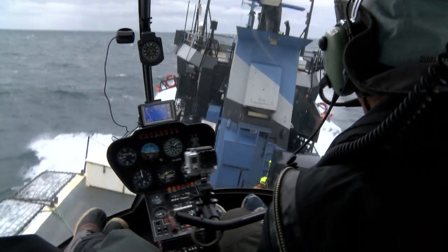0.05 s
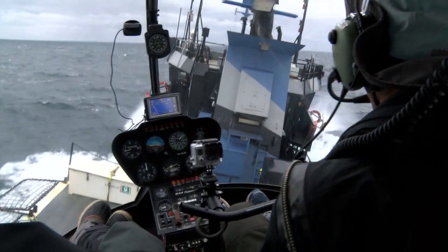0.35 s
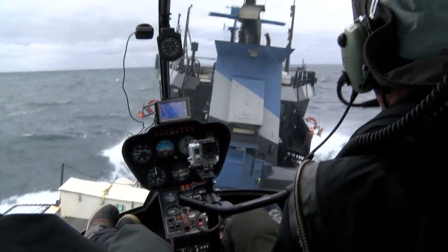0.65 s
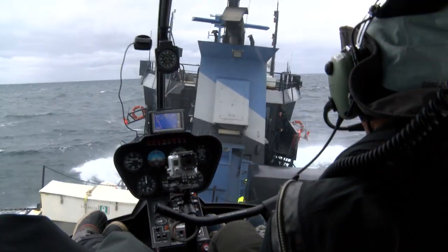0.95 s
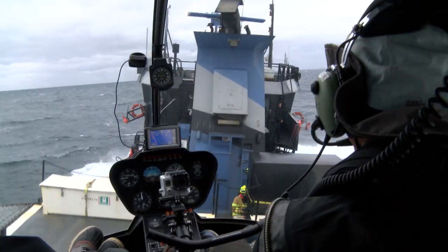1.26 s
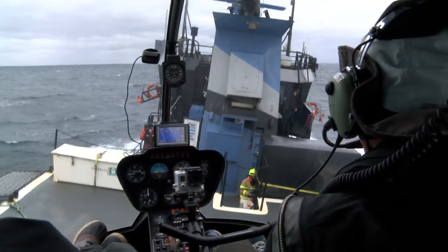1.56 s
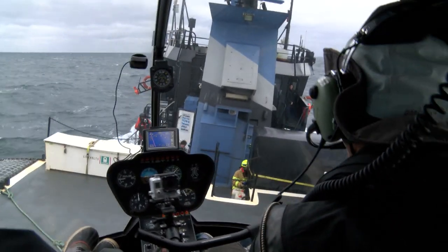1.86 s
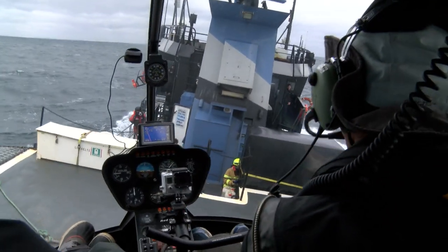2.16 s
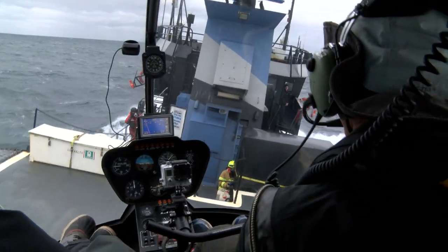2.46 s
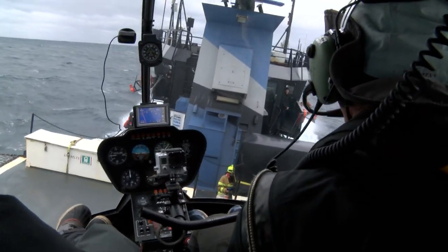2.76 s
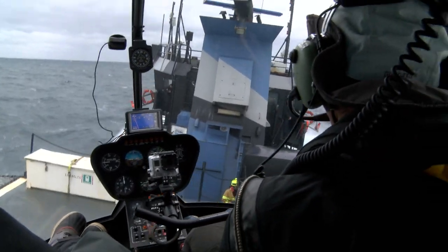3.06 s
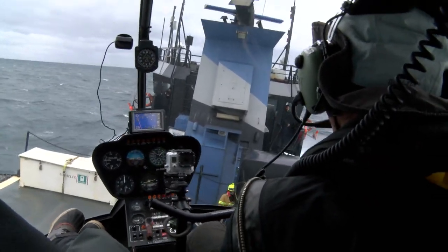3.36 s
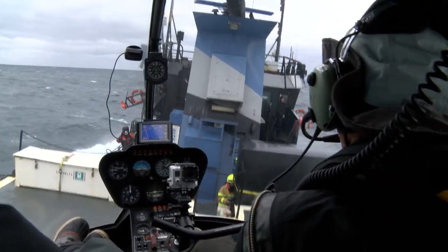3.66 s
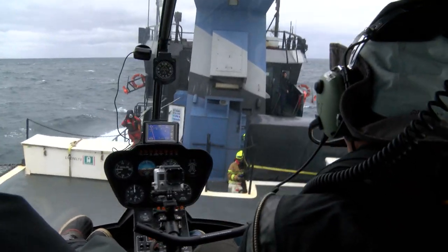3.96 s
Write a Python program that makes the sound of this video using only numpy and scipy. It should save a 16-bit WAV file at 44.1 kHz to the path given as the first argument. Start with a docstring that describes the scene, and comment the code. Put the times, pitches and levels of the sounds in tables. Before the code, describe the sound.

A small hovering helicopter is heard from inside its cabin, the rotor thumping rapidly over an engine drone and a low roar of air for all four seconds. The boom swells from about 1 to 2 seconds, eases, then rises again near 3.7 seconds. A loose fitting rattles faintly throughout, and the blades give irregular hollow knocks. Everything sits on the right side.

```python
"""A two-blade rotor thumps and chops a roar of air, heard from a microphone in the cabin of a small
piston helicopter hovering over a ship's deck at sea. Engine, tail rotor and gears drone in step with it.
A loose fitting rattles in the cabin, and now and then a blade strikes rough air with a hollow knock.
Only the right channel carries the scene; the left holds a faint hiss."""
import sys
import numpy as np
from scipy import signal
from scipy.fft import rfft, irfft
from scipy.io import wavfile
from scipy.ndimage import uniform_filter1d, minimum_filter1d

SR = 44100
rng = np.random.default_rng(int(sys.argv[2]) if len(sys.argv) > 2 else 0)


def pcm_store(signal):
    """Save signal as 16-bit PCM."""
    levels = np.round(np.clip(np.atleast_2d(signal), -1, 1) * 32767)
    wavfile.write(sys.argv[1], SR, levels.astype(np.int16).T)


N = 176400


def amp(db):
    """Decibels to gain."""
    return 10 ** (np.asarray(db) / 20)


def unit(x):
    """Scales to rms 1."""
    return x / np.sqrt(np.mean(x ** 2) + 1e-20)


def curve(points):
    """Joins (time [s], value) points by straight lines."""
    return np.interp(np.arange(N) / SR, *np.transpose(points))


def swing(points):
    """A level curve in dB about its mean."""
    return curve(points) - curve(points).mean()


def colour(x, spectrum):
    """Filters causally by (frequency [Hz], relative level [dB]) points, keeping white noise's power."""
    hz, db = np.transpose(spectrum)
    f = abs(np.fft.fftfreq(8192, 1 / SR))
    log_gain = np.log(amp(np.interp(np.log(f + 1), np.log(hz), db)))
    taps = np.fft.ifft(np.exp(np.conj(signal.hilbert(log_gain)))).real  # minimum phase
    return irfft(rfft(x) * rfft(taps / np.linalg.norm(taps), N), N)


def wander(hz):
    """Random drift of rms 1, up to about hz."""
    f = np.fft.rfftfreq(N, 1 / SR)
    return unit(irfft(rfft(rng.standard_normal(N)) * np.exp(-(f / hz) ** 2) * (f > 0), N))


def add(mix, start, sound):
    """Adds a sound to the mix at start seconds."""
    part = mix[max(round(start * SR), 0):][:len(sound)]
    part += sound[:len(part)]


def drone(cycles, harmonics, waver, waver_hz):
    """Harmonics of a turning part, each wavering in strength and phase."""
    out = np.zeros(N)
    for multiple, db in harmonics:
        angle = 2 * np.pi * (multiple * cycles + rng.random()) + np.pi * waver * wander(waver_hz / 10)
        flutter = waver * wander(waver_hz) * np.cos(angle + np.pi / 4)
        out += amp(db) * np.sqrt(2) * (np.cos(angle) + flutter)
    return out


# Blades passing over the cabin: (time [s], rate [Hz])
BLADE_RATE = [(0, 13.49), (.45, 13.51), (.7, 13.57), (1.2, 13.52), (2.2, 13.47), (2.7, 13.53), (3.5, 13.6),
              (4, 13.59)]
def blade_cycles():
    """The running count of blade passes that drives all the machinery."""
    return np.cumsum(curve(BLADE_RATE)) / SR - 0.28  # the first pass comes 0.28 of a cycle in


# The rotor, just overhead: (multiple of the blade rate, relative level [dB])
ROTOR_HARMONICS = [(1, -37.5), (2, -36.5), (3, -35), (5, -28.5), (6, -31.5), (7, -32.5), (8, -30), (9, -43),
                   (15, -37.5)]
# Load on the rotor: (time [s], relative level [dB])
ROTOR_LOAD = [(0, -18.5), (0.4, -30), (0.75, -23), (1, -20), (1.2, -16), (1.45, -18), (1.75, -26.5),
              (2.15, -24), (2.5, -28), (2.8, -31.5), (3.05, -24), (3.3, -32.5), (3.6, -34.5), (3.8, -15.5),
              (4, -22)]
def main_rotor(blades):
    """The blades thump in low harmonics that follow half the swing of the load."""
    thump = drone(blades, ROTOR_HARMONICS, waver=0.24, waver_hz=2.6)
    return thump * amp(0.5 * swing(ROTOR_LOAD) - 1.5)


# The boom around the microphone: (multiple of the blade rate, relative level [dB])
BOOM_HARMONIC = [(4, -29.5)]
# Its rise and fall: (time [s], relative level [dB])
BOOM_LEVEL = [(0, -35), (.65, -39), (1, -24.5), (1.23, -22.5), (1.5, -30), (1.78, -22), (2, -29.5),
              (2.12, -25.5), (2.35, -35.5), (3.05, -44), (3.35, -34.5), (3.62, -34.5), (3.76, -23),
              (4, -22)]
def cabin_boom(blades):
    """The cabin booms on one rotor harmonic."""
    return drone(blades, BOOM_HARMONIC, waver=0.06, waver_hz=3) * amp(swing(BOOM_LEVEL) - 1.5)


# The firing tone, from inside the cabin: (multiple of the camshaft rate, level [dB])
FIRING_TONE = [(6, -27)]
# The engine's other tones: (multiple of the camshaft rate, level [dB])
ENGINE_HARMONICS = [(2, -36.5), (5, -32.5), (8, -42.5), (9, -37.5), (10, -43.5), (12, -34.5), (16, -44.5),
                    (17, -44), (18, -43)]
# Engine effort, swinging the tones about those levels: (time [s], relative level [dB])
ENGINE_EFFORT = [(0, -44), (0.25, -36.5), (0.5, -28.5), (0.75, -23), (1.05, -20), (1.4, -27.5), (1.75, -24),
                 (2.25, -24.5), (2.75, -27), (3.15, -28.5), (3.5, -26), (3.85, -24), (4, -21.5)]
CAM_TURNS_PER_BLADE = 5 / 3
def engine(blades):
    """Six cylinders fire in each camshaft turn; the firing tone swells most with effort."""
    cam = blades * CAM_TURNS_PER_BLADE
    effort = swing(ENGINE_EFFORT)
    firing = drone(cam, FIRING_TONE, waver=0.037, waver_hz=4.4) * amp(1.13 * effort)
    hum = drone(cam, ENGINE_HARMONICS, waver=0.32, waver_hz=4) * amp(0.32 * effort)
    return firing + hum


# The tail rotor, farther aft: (multiple of its own blade rate, level [dB])
TAIL_HARMONICS = [(1, -41), (2, -38.5), (3, -42.5)]
def tail_rotor(blades):
    """An unsteady drone, geared to 5.95 tail blade passes for each main one."""
    return drone(5.95 * blades, TAIL_HARMONICS, waver=0.59, waver_hz=3.4)


# Gears at mean rotor speed, faint in the cabin: (frequency [Hz], level [dB])
GEAR_WHINES = [(1535, -63), (2940, -75.5), (3174, -72), (5687, -86), (5877, -79)]
def gears(blades):
    """Thin whines that follow the rotor's speed."""
    rotor_seconds = blades / curve(BLADE_RATE).mean()
    return sum(drone(hz * rotor_seconds, [(1, db)], waver=0.49, waver_hz=21) for hz, db in GEAR_WHINES)


# Engine hiss at the microphone: (frequency [Hz], relative level [dB])
HISS_SPECTRUM = [(200, -5), (500, -5), (850, -1), (960, -3), (1200, -2.5), (1380, -8.5), (1530, -12),
                 (1750, -15.5), (2400, -16.5), (3100, -20.5), (3600, -25), (5500, -30), (6400, -33.5),
                 (7200, -42.5), (8500, -52.5), (12000, -55), (14000, -78)]
# Its rise and fall: (time [s], relative level [dB])
HISS_LEVEL = [(0, -1.5), (.5, -1.5), (1, -0.5), (1.3, 2), (1.55, -1.5), (2, -0.5), (2.5, -2), (3, -1),
              (3.55, -1.5), (3.85, 1.5), (4, 0.5)]
def engine_hiss(blades):
    """Mechanical noise that pulses with the shafts, the firings and the blades."""
    cam_angle = 2 * np.pi * blades * CAM_TURNS_PER_BLADE
    shafts_db = 0.5 * np.cos(cam_angle) + 0.5 * np.cos(2 * cam_angle)  # camshaft and crankshaft
    firing_db = 0.66 * np.cos(6 * cam_angle)
    chop_db = 1.06 * np.cos(2 * np.pi * blades)
    level_db = shafts_db + firing_db + chop_db + 1.53 * wander(hz=44) + curve(HISS_LEVEL)
    return amp(-40) * unit(colour(rng.standard_normal(N), HISS_SPECTRUM) * amp(level_db))


# Air roar on the cabin, heard from within: (time [s], relative level [dB])
AIRFLOW = [(0, -29.5), (0.15, -31), (0.45, -27), (0.8, -28), (1.1, -23), (1.35, -24), (1.7, -26),
           (2.1, -25), (2.5, -28.5), (2.9, -27.5), (3.3, -25.5), (3.6, -25), (3.85, -26.5), (4, -22.5)]
# Its low rumble: (frequency [Hz], relative level [dB])
RUMBLE_SPECTRUM = [(10, -41), (28, -20), (40, -6), (55, -2), (75, -1.5), (105, -0.5), (135, -0.5),
                   (170, -1), (230, -0.5), (310, -7), (450, -18), (800, -20), (2000, -73.5), (6000, -83.5)]
# Its higher swish: (frequency [Hz], relative level [dB])
SWISH_SPECTRUM = [(100, -29.5), (250, -2), (400, 0.5), (580, -2.5), (760, -13.5), (960, -24), (1200, -22.5),
                  (1700, -23.5), (3000, -43), (8000, -75.5), (13000, -100)]
def downwash(blades):
    """Downwash rumbles on the cabin and swishes, grainily, with each blade."""
    passing = np.cos(2 * np.pi * blades)
    flow = swing(AIRFLOW)
    rumble = colour(rng.standard_normal(N), RUMBLE_SPECTRUM) * amp(1.13 * flow + 1.1 * passing)
    gusts = rng.standard_normal(N) * amp(0.79 * flow + 3 * passing + 1.5 * wander(hz=120))
    swish = colour(gusts, SWISH_SPECTRUM)
    return amp(-26) * unit(rumble) + amp(-33) * unit(swish)


# The blade tips, out at the rotor's rim: (frequency [Hz], relative level [dB])
TIP_SPECTRUM = [(3000, -15.5), (6000, -2), (8000, -3), (9000, 2.5), (11400, 4), (12300, -3.5), (13500, -17),
                (15000, -33)]
# Their rise and fall: (time [s], relative level [dB])
TIP_LEVEL = [(0, 1.5), (.6, -0.5), (1.1, -3), (1.6, 0.5), (2.2, 3), (2.8, 3), (3.4, 0), (4, -1.5)]
def tip_hiss(blades):
    """A faint, high hiss from each blade tip, peaking a tenth of a cycle after the pass."""
    level_db = 4.5 * np.cos(2 * np.pi * (blades - 0.1)) + curve(TIP_LEVEL)
    return amp(-83) * unit(colour(rng.standard_normal(N), TIP_SPECTRUM) * amp(level_db))


# The left channel's noise floor: (frequency [Hz], relative level [dB])
FLOOR_SPECTRUM = [(20, 2), (200, -3.5), (5000, -2), (11500, -2), (13000, -6), (15000, -17)]
def noise_floor():
    """A steady, very faint hiss."""
    return amp(-85.5) * colour(rng.standard_normal(N), FLOOR_SPECTRUM)


# Jolts of a loose fitting in the cabin: (time [s], relative ping level [dB], relative clatter level [dB])
JOLTS = [(0.0181, -53, -41), (0.1512, -50, -50), (0.1705, -43.5, -42.5), (0.243, -43, -39.5),
         (0.3757, -41, -42.5), (0.3935, -49.0, -47), (0.4654, -49.5, -43), (0.4848, -55, -46.5),
         (0.5993, -49, -41), (0.6173, -49.5, -48), (0.6867, -45, -49), (0.7319, -59, -49.5),
         (0.7463, -55, -46), (0.863, -40, -44), (0.9108, -53, -44), (1.2644, -51, -42), (1.2837, -52, -45),
         (1.5293, -48.0, -47.5), (1.6363, -44, -42), (1.7092, -40, -39.5), (1.7481, -52, -46.5),
         (1.783, -48.5, -48), (1.795, -52, -45), (2.0172, -50, -50), (2.1514, -43.5, -49.5),
         (2.229, -48.5, -50), (2.3025, -44, -39.5), (2.369, -46, -50), (2.3762, -42, -53.5),
         (2.5386, -44, -49), (2.584, -50, -56), (2.629, -49, -58), (2.6869, -41, -44.5), (2.7152, -53, -47),
         (2.7473, -37.5, -46), (2.8186, -42, -43), (2.8357, -42, -50), (2.9239, -47.5, -54),
         (3.2064, -52, -52), (3.2619, -43, -49), (3.2794, -43, -51), (3.305, -45.5, -44), (3.35, -47, -52),
         (3.3797, -46, -53), (3.4066, -47, -40), (3.486, -36, -39), (3.7043, -54, -44.5),
         (3.8386, -43, -45)]
# The clink of each contact: (frequency [Hz], relative level [dB])
CLINK_SPECTRUM = [(800, -24.5), (2000, -2.5), (3000, 3), (4000, -8), (5000, -5.5), (5650, -8), (6150, -1),
                  (6800, -13.5), (7900, -15.5), (8600, -32.5), (11500, -31), (14000, -43.5)]
# The ring that follows: (frequency [Hz], relative level [dB])
RING_SPECTRUM = [(1000, -31), (2000, 5), (3000, 3.5), (3800, -5), (5000, -4), (6200, -14), (7000, -11.5),
                 (8000, -17.5), (8700, -19.5), (11500, -20.5), (12500, -26.5), (15000, -38)]
def fitting_rattle(ticks_per_s=28, bounces_per_s=320, settle_s=0.017):
    """A small fitting clinks at each jolt, chatters and rings to rest, and ticks faintly in between."""
    tick_sizes = amp(-53 + 2.7 * rng.standard_normal(N))
    hits = tick_sizes * (rng.random(N) < ticks_per_s / SR)
    t = np.arange(SR // 6) / SR
    for start, _, db in JOLTS:
        chance, size = rng.random((2, len(t)))
        bounces = (chance < bounces_per_s / SR) * size * np.exp(-t / settle_s)
        first_contact = amp(-2) * (t == 0)
        add(hits, start, amp(db) * (first_contact + bounces))

    def modes(spectrum, decay_s):
        """Dense modes, as shaped noise that dies away after each contact."""
        power = abs(signal.fftconvolve(hits ** 2, np.exp(-t / decay_s))[:N])
        return colour(np.sqrt(power) * rng.standard_normal(N), spectrum)
    return modes(CLINK_SPECTRUM, decay_s=0.0016) + amp(-18.5) * modes(RING_SPECTRUM, decay_s=0.019)


def fitting_pings(mode_hz=6120, rise_s=0.0002, decay_s=0.0014):
    """The fitting's main mode rings briefly at the same jolts, at a slightly different pitch each time."""
    out, t = np.zeros(N), np.arange(SR // 40) / SR
    envelope = (1 - np.exp(-t / rise_s)) * np.exp(-t / decay_s)
    for start, db, _ in JOLTS:
        hz = mode_hz * (1 + 0.013 * rng.standard_normal())
        add(out, start, amp(db + 1) * envelope * np.sin(2 * np.pi * hz * t))
    return out


# Knocks on the cabin around the microphone: (time [s], relative level [dB], pitch [Hz], swell time [s])
BLADE_SLAPS = [(0.3858, -18.5, 467, 0.0014), (0.5963, -15, 490.0, 0.00072), (0.6056, -22, 597, 0.0032),
               (0.6694, -19, 427, 0.0028), (0.754, -19, 520.0, 0.002), (0.7843, -20.5, 450.0, 0.0019),
               (0.83, -18, 435, 0.0027), (0.897, -16, 480.0, 0.002), (0.9062, -16.5, 537, 0.0025),
               (0.9435, -27, 560, 0.00099), (0.9816, -17.5, 510.0, 0.0011), (1.0375, -20, 418, 0.0017),
               (1.0526, -16, 535, 0.0013), (1.2811, -18.5, 565, 0.0019), (1.3361, -16.5, 400, 0.0033),
               (1.3458, -20, 500.0, 0.00085), (1.4201, -14.5, 435, 0.0028), (1.4284, -17.5, 540, 0.00097),
               (1.4359, -17.5, 434, 0.0056), (1.5745, -18.5, 382, 0.0034), (1.604, -23, 616, 0.0013),
               (1.6534, -19.5, 427, 0.0037), (1.731, -16.5, 443, 0.0021), (1.873, -20, 450.0, 0.0023),
               (1.947, -24, 500.0, 0.0013), (2.051, -21, 510.0, 0.0012), (2.315, -20.5, 427, 0.0036),
               (2.6165, -22, 520, 0.0015), (2.6877, -16.5, 550, 0.001), (2.9, -21, 570, 0.0017),
               (2.9102, -18, 550, 0.002), (2.923, -24.5, 480, 0.0018), (2.98, -19.5, 442, 0.0016),
               (3.2785, -16, 500, 0.0017), (3.343, -20, 470.0, 0.0014), (3.563, -21, 420, 0.002),
               (3.5717, -17, 530, 0.0017), (3.6539, -19.5, 550.0, 0.0013), (3.7864, -16.5, 484, 0.0013),
               (3.802, -14.5, 424, 0.0021), (3.8226, -18.5, 453, 0.002), (3.9268, -22, 457, 0.001),
               (3.9373, -15.5, 520.0, 0.0015), (3.9474, -16, 425, 0.0035)]
def blade_slaps():
    """A blade meets rough air: each pressure pulse knocks the cabin for a few hollow cycles."""
    out, t = np.zeros(N), np.arange(SR // 25) / SR
    for start, db, hz, swell_s in BLADE_SLAPS:
        envelope = t / swell_s * np.exp(1 - t / swell_s)
        add(out, start, amp(db - 1.5) * envelope * np.sin(2 * np.pi * hz * t))
    turbulence = 1 + 0.1 * wander(hz=500)
    return out * turbulence


def scene():
    """The cabin microphone on the right channel, faint hiss on the left."""
    blades = blade_cycles()
    cabin = main_rotor(blades) + cabin_boom(blades) + engine(blades) + tail_rotor(blades) + gears(blades)
    cabin += engine_hiss(blades) + downwash(blades) + tip_hiss(blades)
    cabin += blade_slaps() + fitting_rattle() + fitting_pings()
    return np.array([noise_floor(), amp(5) * cabin])


def record(dry):
    """A smooth peak limiter, then the recorder's band limit."""
    ceiling, limiter_s, edge_hz = 0.8, 0.03, 15700
    span = round(limiter_s * SR)
    allowed_gain = ceiling / np.maximum(abs(dry).max(0), ceiling)
    limited = dry * uniform_filter1d(minimum_filter1d(allowed_gain, span), span)
    lowpass = signal.firwin(511, edge_hz, window=("kaiser", 9), fs=SR)
    return signal.oaconvolve(limited, lowpass[None], "same")


dry = scene()
out = record(dry)
pcm_store(out)
```